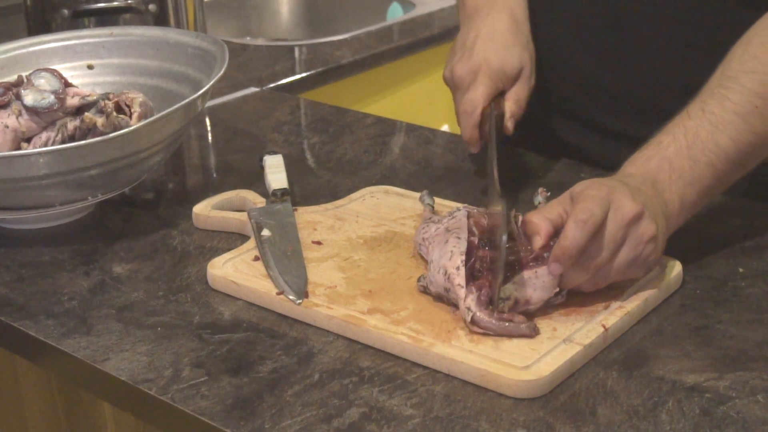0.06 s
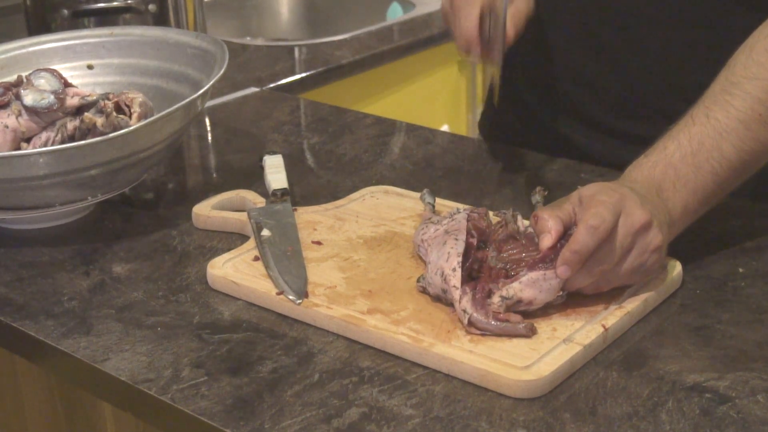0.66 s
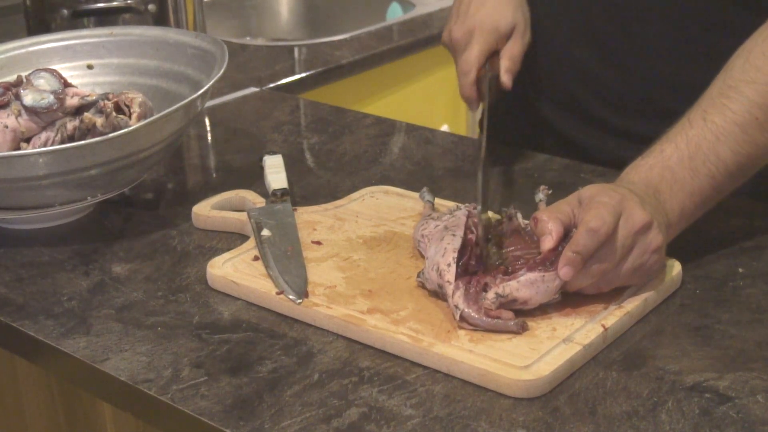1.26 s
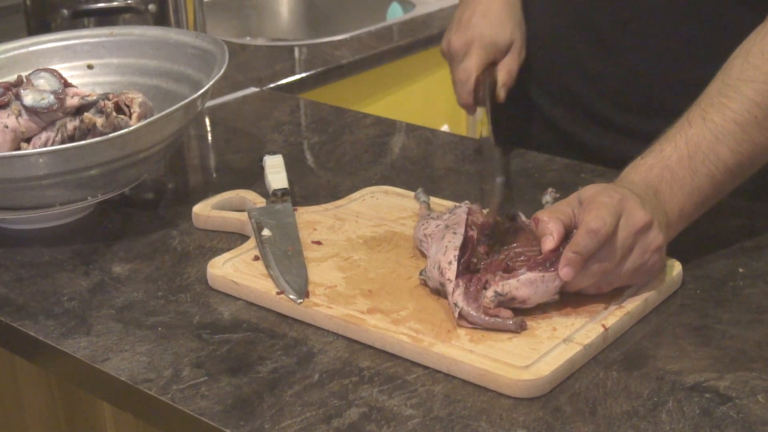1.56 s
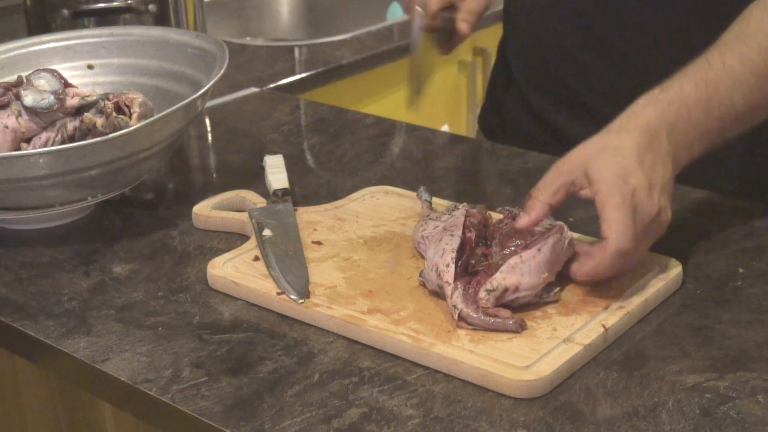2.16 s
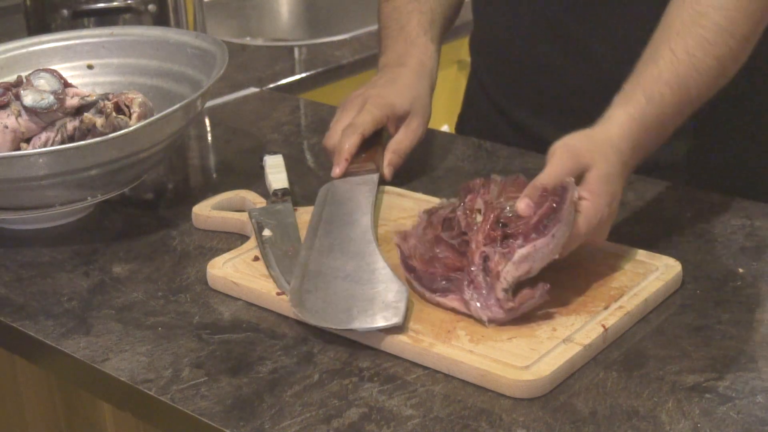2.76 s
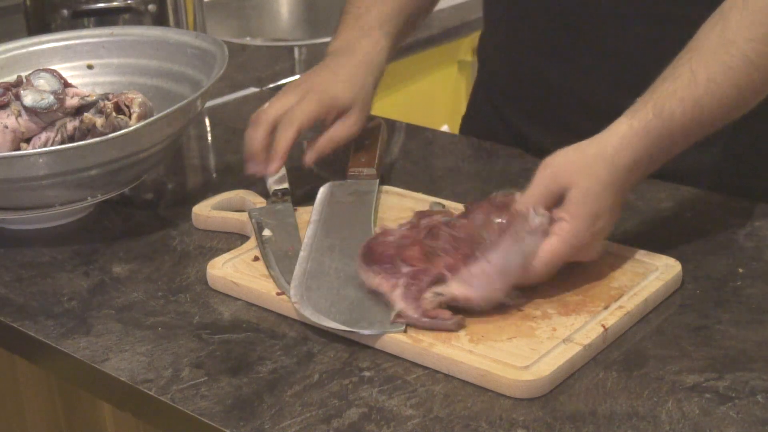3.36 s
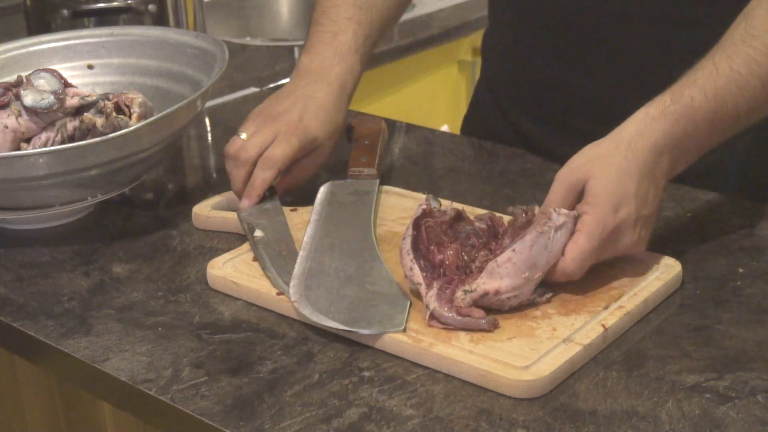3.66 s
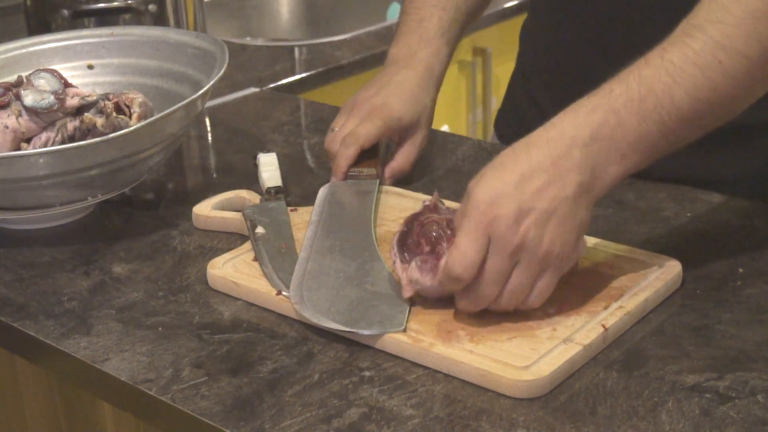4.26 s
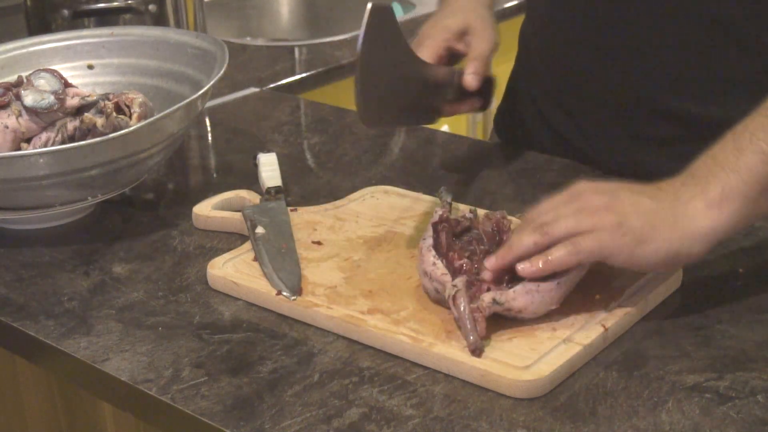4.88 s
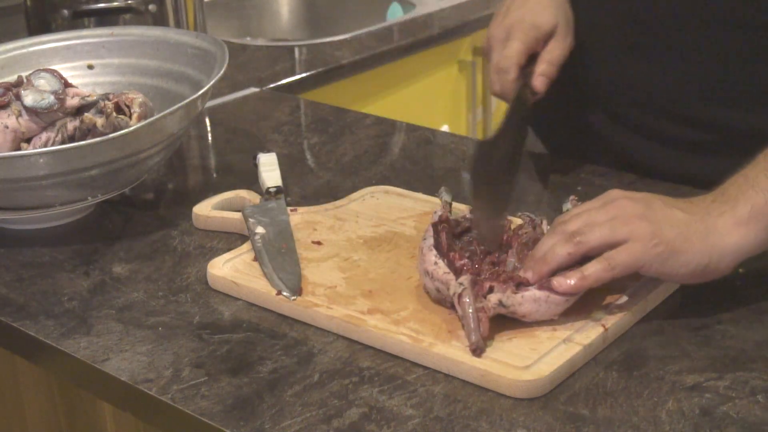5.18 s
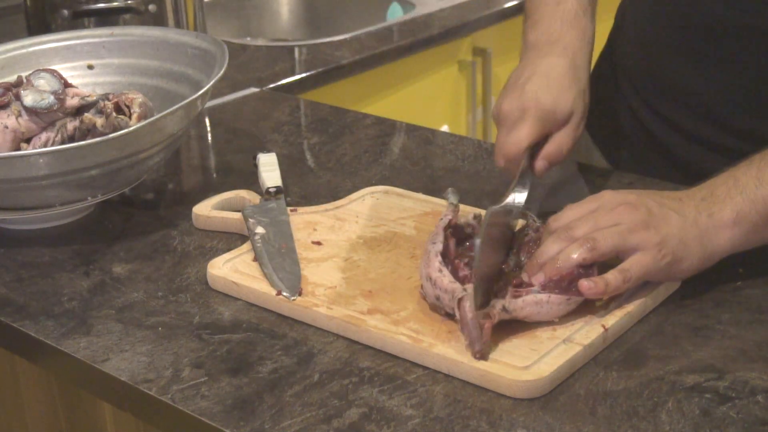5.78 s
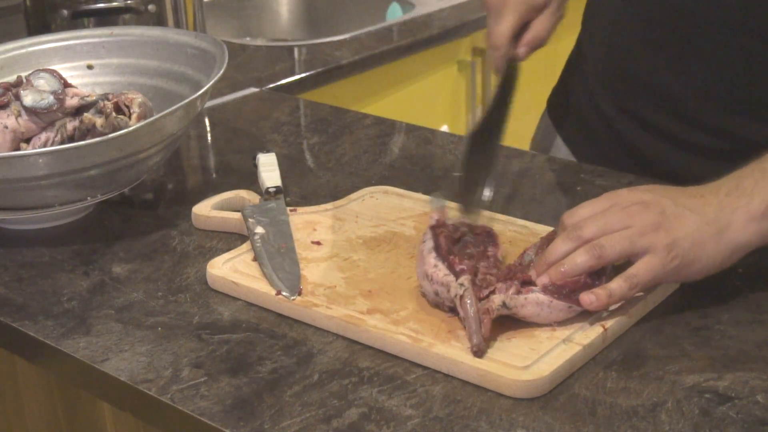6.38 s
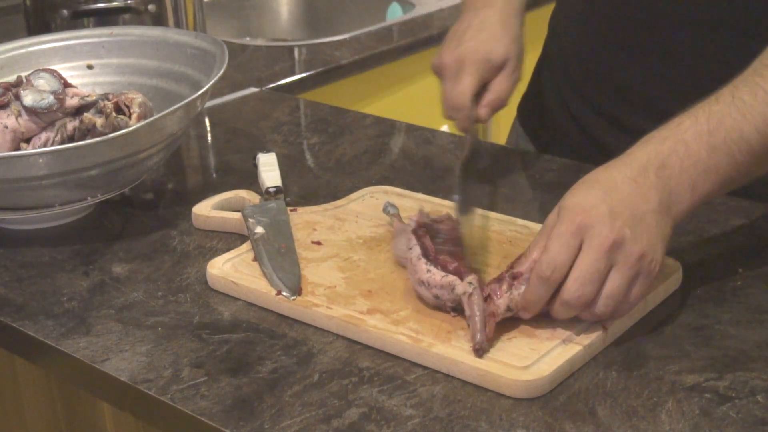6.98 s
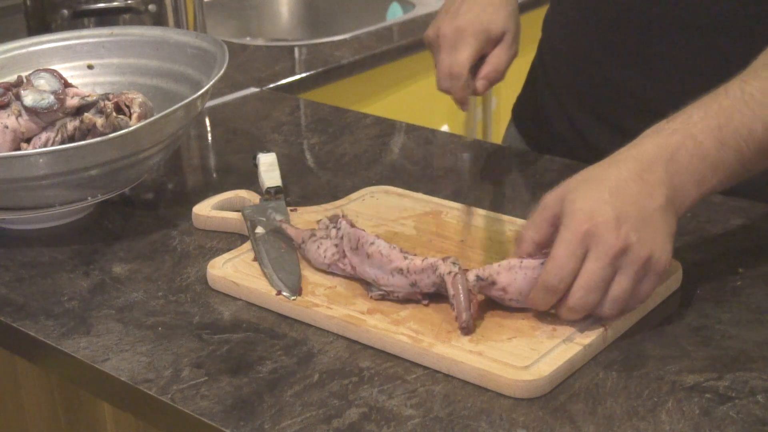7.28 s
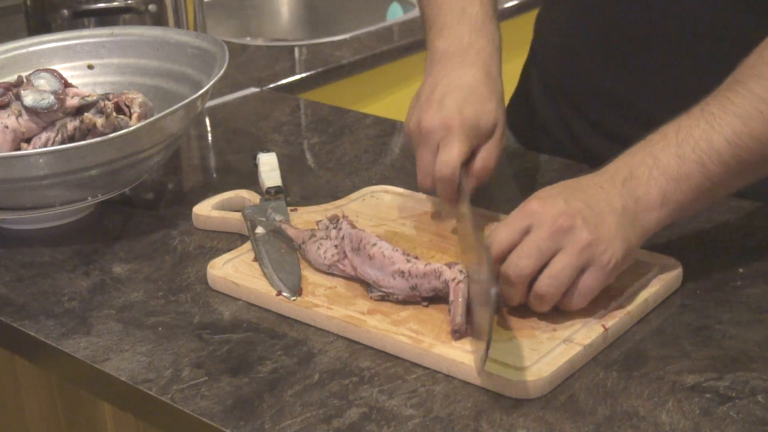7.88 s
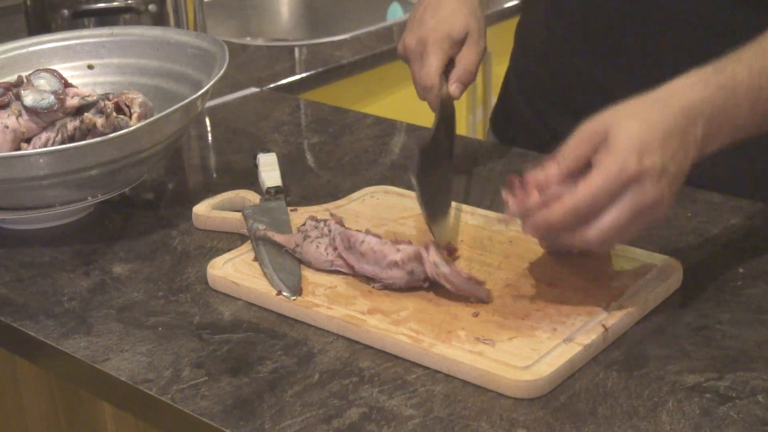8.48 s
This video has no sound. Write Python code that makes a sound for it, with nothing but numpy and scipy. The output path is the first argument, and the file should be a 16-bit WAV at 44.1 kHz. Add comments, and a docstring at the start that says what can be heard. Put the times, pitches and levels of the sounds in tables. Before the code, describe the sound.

Four heavy chops split poultry bones against a wooden cutting board, each ringing through a kitchen. Steel then clinks and scrapes on the board, and the meat lands with a soft slap. Bones crack and moist gristle crunches as the cleaver is pushed through. The work sits slightly right of the microphone, over a faint appliance rush that dips under the blows and slowly creeps back.

```python
"""A hard-walled kitchen rings from a cleaver blow just struck; four more split a bird carcass on a wooden
board. The steel blade clinks as it is laid down, rasps and sings by friction as it is dragged off the board,
then is set on the bone and pressed through snapping joints and crunching gristle. Impacts are filtered
impulses and damped modes; ruptures and slips are random pulse trains. An automatic gain control ducks
under the blows and creeps back, so the room noise slowly swells."""
import sys
import numpy as np
from scipy import signal
from scipy.fft import rfft, irfft, next_fast_len
from scipy.io import wavfile
from scipy.ndimage import uniform_filter1d

SR = 44100
rng = np.random.default_rng(int(sys.argv[2]) if len(sys.argv) > 2 else 0)


def to_wav(s):
    """Save 16-bit WAV."""
    ch = np.atleast_2d(s).T  # columns
    pcm = np.round(np.clip(ch, -1, 1) * 32767)  # PCM
    wavfile.write(sys.argv[1], SR, pcm.astype(np.int16))


N = 376613

# modes of the cleaver, damped by hand and meat: f/Hz, level/dB, T60/s
CLEAVER_MODES = [(1120, -5.5, 0.099), (1665, 4.5, 0.097), (1970, 8, 0.087), (2680, 7, 0.026),
                 (3490, -2.5, 0.06), (5180, 0, 0.044), (5800, -11, .06), (6340, 1.5, .085),
                 (7050, 0, 0.066), (8300, -0.5, 0.057), (10040, 2, 0.026), (10850, -20, 0.18),
                 (12200, -15, .06), (14000, -14, .06)]
# spectra of a small knock, of rupturing tissue and of the board's thud: f/Hz, level/dB
KNOCK_SPECTRUM = [(100, -27.5), (220, -9.5), (450, 4), (900, 2), (1500, -6), (2000, 0.5), (3000, -4),
                  (5000, -10.5), (8000, -17.5), (11000, -20), (16000, -28.5)]
TISSUE_SPECTRUM = [(120, -20.5), (250, -10.5), (500, -1.5), (900, 0), (1700, -2.5), (3300, -4),
                   (6700, -11.5), (9000, -12.5), (16000, -18)]
THUD_SPECTRUM = [(30, -79), (60, -41), (100, -23), (160, -1.5), (280, 6.5), (450, 2), (800, -18.5),
                 (2500, -51)]


def chops(bone_db=-3, board_lag_s=.003, splinter_s=.073):
    """Impact and brittle fracture: the cleaver splits bone, slams into the board, and splinters crackle."""
    blows = [(-.11, 18.5, -13), (0.7936, 17, -0.5), (1.2135, 16.5, 1), (1.553, 10.5, -3.5),
             (1.862, 13, -5.5)]  # t/s, slam level/dB, splinter level/dB
    impact_spectrum = [(30, -40), (60, -48), (90, -25.5), (150, -11.5), (250, -4), (420, 0.5), (650, -1),
                       (1000, -3.5), (1800, -9.5), (2600, -15.5), (5000, -26), (9000, -33.5),
                       (13500, -40.5), (16000, -53)]  # f/Hz, level/dB
    out, t = np.zeros((2, N)), clock(splinter_s)
    for s, db, splinter_db in blows:
        split = amp(db + bone_db) * tap(impact_spectrum, tilt_db=1)
        slam = amp(db) * tap(impact_spectrum, tilt_db=.5)
        fractures = grains(t, rate=700, spread_db=4)
        splinters = amp(splinter_db) * stroke(t) * unit(colour(fractures, TISSUE_SPECTRUM, tilt_db=2))
        add(out, s, kitchen(split, direct_db=-8, scatter_s=.003))
        add(out, s + board_lag_s, kitchen(slam, direct_db=-8, scatter_s=.003))
        add(out, s, kitchen(splinters, direct_db=-4, scatter_s=.00041))
    return out


def clinks(bounce_s=.014, bounce_db=-14.5):
    """Impulse excitation: the loosely held cleaver clicks, rings and rebounds once at each contact."""
    contacts = [(2.634, -38.5, 1.5, -22), (2.761, -23.5, 6.5, -1), (2.9358, -14, 2.5, -19),
                (3.917, -26, -4, -25), (3.935, -18, 7.5, -7), (4.9607, -49.5, 2, -12),
                (4.9989, -48, 7.5, -5), (5.334, -41, 6.5, -6.5)]  # t/s, level/dB, tilt/(dB/octave), ring re click/dB
    clank_spectrum = [(100, -27), (220, -8), (450, 4.5), (750, 2.5), (1100, 5), (1400, -1), (1950, 4.5),
                      (3000, -5.5), (4500, -15), (8000, -23), (10000, -22.5), (11000, -25), (16000, -33)]  # flat steel on wood: f/Hz, level/dB
    out = np.zeros((2, N))
    for s, db, tilt_db, ring_db in contacts:
        steel = amp(db) * (tap(clank_spectrum, tilt_db) + amp(ring_db) * blade(CLEAVER_MODES))
        thud_db = -26.5 + 1.5 * (db + 16.5)  # the thud grows faster than the clink
        wood = amp(thud_db) * board(boom_db=-27)
        add(out, s, kitchen(steel + wood, direct_db=-5.5, scatter_s=.002))
        add(out, s + bounce_s, kitchen(amp(bounce_db) * steel, direct_db=-6.5))
    return out


def cracks(ring_db=-17, touch_db=-20, touch_lead_s=.006):
    """Sudden stress release: the edge touches, bone snaps, and the blade's drop thuds in the board."""
    breaks = [(5.4383, -33.5, 4.5, -29.5), (5.72, -37.5, -2.5, -40.5), (5.7897, -26.5, 5, -40),
              (6.065, -32, 5.5, -29), (6.98, -22.5, 2.5, -34.5), (7.892, -31, 1, -37),
              (7.952, -30.5, 1, -36.5)]  # t/s, snap level/dB, tilt/(dB/octave), thud level/dB
    out = np.zeros((2, N))
    for s, db, tilt_db, thud_db in breaks:
        snap = amp(db) * (tap(KNOCK_SPECTRUM, tilt_db) + amp(ring_db) * blade(CLEAVER_MODES))
        thud = amp(thud_db) * board(boom_db=-8)
        add(out, s - touch_lead_s, kitchen(amp(touch_db) * snap, direct_db=-11.5, scatter_s=.003))
        add(out, s, kitchen(snap + thud, direct_db=-8.5, scatter_s=.00089))
    return out


def cuts(sheen_db=-12, entry_tilt_db=.56, sink_tilt_db=-2.5, rumble_db=-8, rumble_lag_s=.035):
    """Progressive rupture: gristle crunches, duller as the edge sinks; blade and board are set vibrating."""
    pushes = [(5.653, .21, -29.5), (5.896, 0.23, -24.5), (6.991, .15, -33), (7.578, 0.64, -40.5),
              (7.829, 0.25, -31.5), (8.019, 0.31, -24)]  # t/s, duration/s, level/dB
    out = np.zeros((2, N))
    for s, length, db in pushes:
        t = clock(length)
        force, depth = amp(db) * stroke(t), t / length
        ruptures = grains(t, rate=900, spread_db=2.5)
        bright = unit(colour(ruptures, TISSUE_SPECTRUM, entry_tilt_db))
        dull = unit(colour(ruptures, TISSUE_SPECTRUM, entry_tilt_db + sink_tilt_db))
        crunch = (1 - depth) * bright + depth * dull + amp(sheen_db) * sheen(ruptures)
        rumble = unit(colour(grains(t, rate=400, spread_db=6.5), THUD_SPECTRUM))
        add(out, s, kitchen(force * crunch, direct_db=-7, scatter_s=.00047))
        add(out, s + rumble_lag_s, kitchen(amp(rumble_db) * force * rumble, direct_db=-7))
    return out


def slides():
    """Sliding friction: flat steel rasps over the wet wood grain in fine slips and sings hoarsely."""
    drags = [(3.659, .077, -51.5, 1320, 1500, -47.5), (3.761, 0.13, -45, 2680, 220, -36.5),
             (3.916, .11, -33.5, 2070, 750, -22.5), (4.235, .21, -26, 3720, 1500, -32),
             (4.47, 0.13, -35, 1990, 1010, -37)]  # t/s, duration/s, rasp level/dB, song f/Hz, bandwidth/Hz, song level/dB
    rasp_spectrum = [(88, -68), (150, -39), (280, -12.5), (328, -8), (545, -4.5), (745, -11), (923, -8),
                     (979, -18), (1900, -8), (3840, -8.5), (7040, -15.5), (7920, -18.5), (14500, -19.5),
                     (16000, -23)]  # f/Hz, level/dB
    out = np.zeros((2, N))
    for s, length, rasp_db, hz, width_hz, song_db in drags:
        t = clock(length)
        rasp = unit(colour(grains(t, rate=7400, spread_db=8), rasp_spectrum))
        add(out, s, kitchen(amp(rasp_db) * stroke(t) * rasp, direct_db=-7.5))
        add(out, s, kitchen(amp(song_db) * stroke(t) * song(t, hz, width_hz), direct_db=-1.5))
    return out


def nudges(click_db=-3.5, ring_db=-3):
    """Free vibration: a small knife, nudged against the cleaver, rings in its own modes."""
    touches = [(3.802, -43.5), (3.818, -31), (3.8902, -27)]  # t/s, level/dB
    knife_modes = [(1841, 4.5, 0.084), (2750, -3.5, .12), (4969, 1, .07), (6350, -1, 0.051),
                   (7070, -2, 0.044), (9900, -11, 0.034)]  # f/Hz, level/dB, T60/s
    out = np.zeros((2, N))
    clink = amp(click_db) * tap(KNOCK_SPECTRUM) + amp(ring_db) * blade(knife_modes)
    for s, db in touches:
        add(out, s, kitchen(amp(db) * clink, direct_db=-8, scatter_s=.004))
    return out


def scrapes(sheen_db=-5):
    """Stick-slip friction of the edge on bone: a hoarse note with the blade's ring around it."""
    passes = [(5.42, 0.099, -37), (6.351, 0.14, -59), (7.5, 0.26, -58), (7.888, .11, -33),
              (8.061, 0.11, -34.5)]  # t/s, duration/s, level/dB
    out = np.zeros((2, N))
    for s, length, db in passes:
        t = clock(length)
        note = song(t, hz=3380, width_hz=800)
        ring = amp(sheen_db) * sheen(grains(t, rate=1500, spread_db=.5))
        add(out, s, kitchen(amp(db) * stroke(t) * (note + ring), direct_db=-3.5))
    return out


def flops():
    """Inelastic impact: the soft carcass lands on the board with a small slap and a dull thud."""
    landings = [(3.393, -53, -40), (4.745, -39, -46.5)]  # t/s, thud level/dB, slap level/dB
    out = np.zeros((2, N))
    for s, thud_db, slap_db in landings:
        thud = amp(thud_db) * board(boom_db=-20)
        slap = amp(slap_db) * tap(KNOCK_SPECTRUM, tilt_db=1.5)
        add(out, s, kitchen(thud + slap, direct_db=-12, scatter_s=.002))
    return out


def wet_meat(sheen_db=-13):
    """Shot noise: wet skin ticks and smacks under the gripping hand and against the blade."""
    grips = [(3.395, .12, -49.5), (4.662, 0.74, -59), (6.329, 0.31, -44.5), (7.098, .75, -54.5),
             (8.204, 0.51, -47)]  # t/s, duration/s, level/dB
    out = np.zeros((2, N))
    for s, length, db in grips:
        t = clock(length)
        smacks = grains(t, rate=400, spread_db=5)
        ticks = unit(colour(smacks, KNOCK_SPECTRUM, tilt_db=6)) + amp(sheen_db) * sheen(smacks)
        add(out, s, kitchen(amp(db) * stroke(t) * ticks, direct_db=-6.5, scatter_s=.0005))
    return out


def blade(modes):
    """Modal superposition: the steel's response to one tap."""
    return transient(sum(amp(db) * mode(hz, t60) for hz, db, t60 in modes))


def board(boom_db, lag_s=.00679):
    """Structure-borne sound: the board thuds and the counter under it booms just after a contact."""
    counter = transient(np.gradient(mode(hz=100, t60=.095)))
    wood = tap(THUD_SPECTRUM) + amp(boom_db) * counter
    return np.pad(wood, (round(lag_s * SR), 0))[:len(wood)]


def song(t, hz, width_hz):
    """Forced resonance: friction noise drives one mode of the steel."""
    resonance = np.exp(-np.pi * width_hz * t) * np.sin(2 * np.pi * hz * t)
    return unit(signal.fftconvolve(rng.standard_normal(len(t)), t * resonance)[:len(t)])


def sheen(slips):
    """Repeated excitation: a run of small slips keeps the cleaver ringing."""
    return unit(signal.fftconvolve(slips, blade(CLEAVER_MODES))[:len(slips)])


def kitchen(x, direct_db, scatter_s=.00024):
    """Reverberation: briefly scattered direct sound, then a diffuse tail with standing waves."""
    room_modes = [(93, -29.5), (130, -27), (170, -31), (205, -24), (251.5, -28.5), (294, -25), (407, -34),
                  (448, -26), (527, -25.5), (617, -24.5), (736, -29.5), (854, -24), (910, -32.5),
                  (1110, -27.5), (1184, -33.5), (1365, -28), (1408, -34.5), (1794, -22.5)]  # f/Hz, level/dB
    tail_spectrum = [(60, -14.5), (150, -5.5), (250, 0.5), (500, -0.5), (1000, 2)]  # f/Hz, level/dB
    decay_times = [(100, 0.78), (260, 0.74), (700, 0.83), (1840, 0.81), (4850, 0.74), (8000, 0.67),
                   (13000, 0.49)]  # f/Hz, T60/s
    direct_spectrum = [(60, -13.5), (200, -8.5), (600, -5.5)]  # weak in the bass: f/Hz, level/dB
    t = clock(1)
    waves = sum(amp(db) * np.sin(2 * np.pi * (hz * t + rng.random()), dtype=np.float32)
                for hz, db in room_modes)
    hz, when, bands = signal.stft(colour(diffuse(SR), tail_spectrum) + waves, SR, nperseg=256)
    decay = np.exp(-np.log(1000) * when / along(decay_times, hz)[:, None])
    tail = signal.istft(bands * decay, SR, nperseg=256)[1][:, :SR]
    early = t[:SR // 20]
    direct = colour(rng.standard_normal(len(early)) * np.exp(-early / scatter_s), direct_spectrum)
    response = tail / np.sqrt(np.sum(tail ** 2) / 2)
    response[:, :len(early)] += amp(direct_db) * direct / np.linalg.norm(direct)
    return signal.fftconvolve(x[None], response, axes=1)


def room_noise(rush_db=-53, hum_db=-76, hum_hz=100):
    """Stationary noise: a broadband appliance rush with a faint mains hum."""
    rush_spectrum = [(30, -31.5), (90, -21), (150, -16.5), (250, -9), (400, -7), (760, -7.5), (1200, -11),
                     (1800, -20.5), (3300, -26.5), (10800, -29), (16000, -40)]  # f/Hz, level/dB
    rush = amp(rush_db) * unit(colour(diffuse(N), rush_spectrum))
    return rush + amp(hum_db) * np.sin(2 * np.pi * hum_hz * np.arange(N) / SR)


def diffuse(size):
    """Diffuse-field coherence: left and right are alike in the bass, unrelated in the treble."""
    side_spectrum = [(60, -30.5), (180, -52.5), (380, -17.5), (700, -11.5), (1300, -7), (2400, -6),
                     (4400, -2.5), (9000, -1)]  # f/Hz, side re mid/dB
    mid, side = rng.standard_normal((2, size))
    side = colour(side, side_spectrum)
    return np.array([mid + side, mid - side])


def mode(hz, t60):
    """A damped oscillator, falling 60 dB in t60 seconds."""
    t = clock(.3)
    return np.exp(-np.log(1000) * t / t60) * np.sin(2 * np.pi * hz * t)


def tap(spectrum, tilt_db=0):
    """A short contact as a filtered impulse."""
    return transient(colour(clock(.3) == 0, spectrum, tilt_db))


def grains(t, rate, spread_db):
    """A Poisson process: tiny pulses of uneven size, on average rate per second."""
    size = amp(spread_db * np.clip(rng.standard_normal(len(t)), -2, 2))
    occurs = rng.random(len(t)) < rate / SR
    return unit(occurs * rng.uniform(-.86, 1, len(t)) * size)


def stroke(t):
    """Half-sine envelope: the hand's pressure rises and falls."""
    return np.sin(np.pi * np.arange(len(t)) / len(t))


def colour(x, spectrum, tilt_db=0):
    """Minimum-phase filter with a given spectrum, tilted in dB per octave around 2 kHz."""
    n = x.shape[-1]
    m = 2 * next_fast_len(n // 2 + 4096)
    hz = np.fft.rfftfreq(m, 1 / SR)
    octaves = np.log2(np.maximum(hz, 250) / 2000)
    cepstrum = irfft(np.log(amp(along(spectrum, hz) + tilt_db * octaves) + 1e-6))
    cepstrum[1:m // 2] *= 2  # folding onto positive time makes the filter causal
    cepstrum[m // 2 + 1:] = 0
    return irfft(rfft(x, m) * np.exp(rfft(cepstrum)), m)[..., :n]


def along(points, hz):
    """Interpolate (f/Hz, value) points on a log frequency axis."""
    f, v = np.transpose(points)
    return np.interp(np.log(hz + 1), np.log(f + 1), v)


def amp(db):
    """Decibels to gain."""
    return 10 ** (np.asarray(db) / 20)


def unit(x):
    """Scale to rms 1."""
    return x / np.sqrt(np.mean(x ** 2) + 1e-20)


def transient(x, span_s=.059):
    """Scale to the energy of a signal of rms 1 lasting span_s."""
    return x / np.sqrt(np.sum(x ** 2) / (span_s * SR) + 1e-20)


def clock(seconds):
    """Sample times."""
    return np.arange(int(seconds * SR)) / SR


def add(out, s, x):
    """Mix x into out at time s."""
    start = round(s * SR)
    x = x[:, max(-start, 0):N - start]
    out[:, max(start, 0):][:, :x.shape[1]] += x


def scene():
    """Superposition: the work at the board, slightly right of centre, over the room noise."""
    work = chops() + clinks() + nudges() + cracks() + cuts() + scrapes() + slides() + flops() + wet_meat()
    return work * amp([[-.3], [.3]]) + room_noise()


def release(cut_db, db_per_s):
    """Peak detection: gain reduction follows each rise at once and recovers at a constant rate."""
    ramp = db_per_s * np.arange(N) / SR
    return np.maximum.accumulate(cut_db + ramp) - ramp


def record(dry, threshold_db=-12.8, slow_depth_db=22, peak_limit=.75, low_hz=45, top_hz=16100):
    """Dynamic compression: gain control with two release rates, soft saturation and band limiting."""
    power = np.abs(uniform_filter1d(np.mean(dry ** 2, axis=0), size=220))
    excess_db = np.maximum(10 * np.log10(power + 1e-12) - threshold_db, 0)
    # the fast release outruns the room's decay, so each heavy blow swells after its impact
    fast_db = release(excess_db, db_per_s=108)
    slow_db = release(np.minimum(excess_db, slow_depth_db), db_per_s=5)
    x = dry * amp(-np.maximum(fast_db, slow_db))
    x = x / (1 + (x / peak_limit) ** 4) ** (1 / 4)
    x = signal.sosfilt(signal.butter(2, low_hz, "high", fs=SR, output="sos"), x)
    m = next_fast_len(N + SR)
    return irfft(rfft(x, m) * (np.fft.rfftfreq(m, 1 / SR) < top_hz), m)[:, :N]


dry = scene()
out = record(dry)
to_wav(out)
```